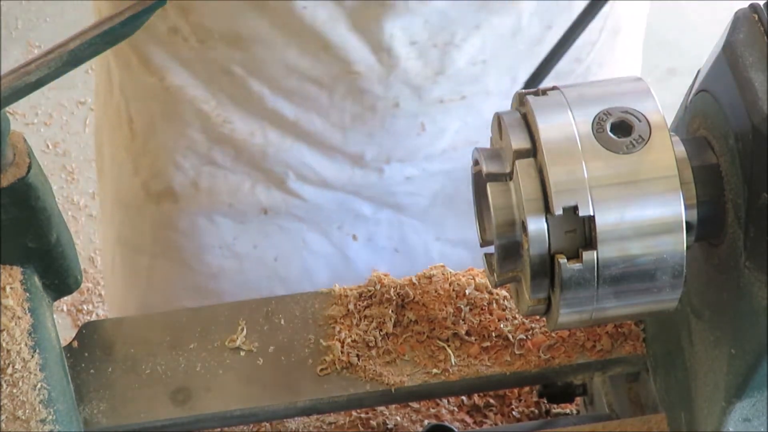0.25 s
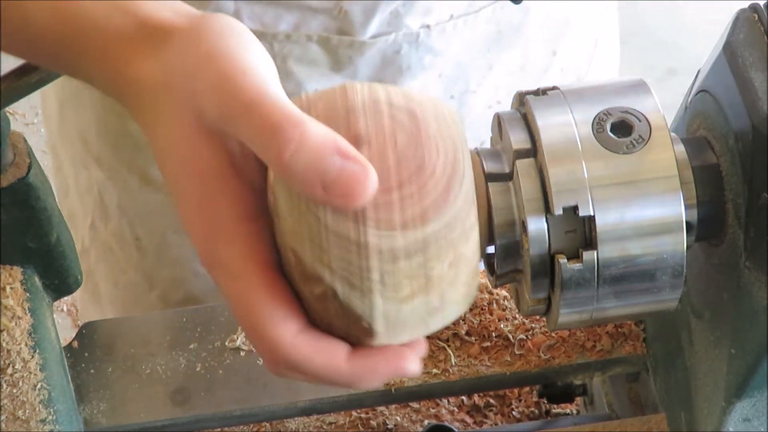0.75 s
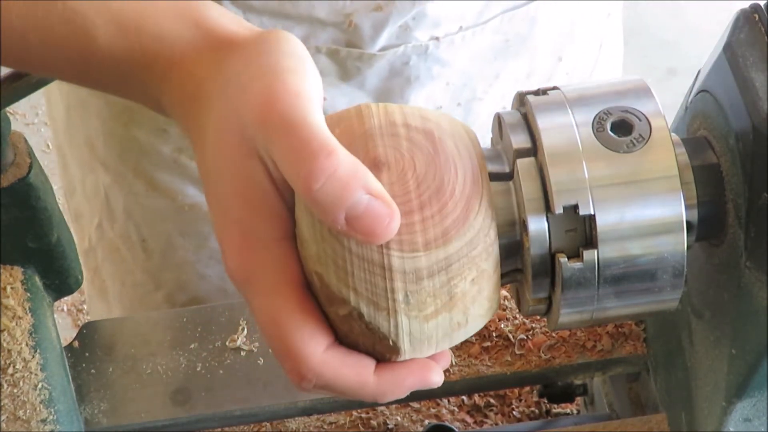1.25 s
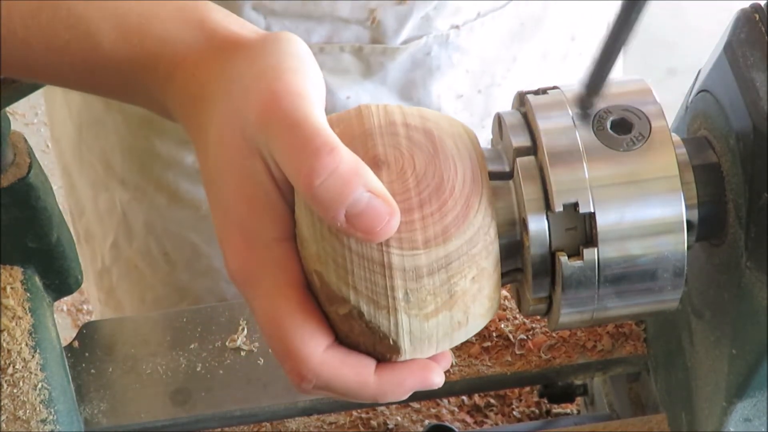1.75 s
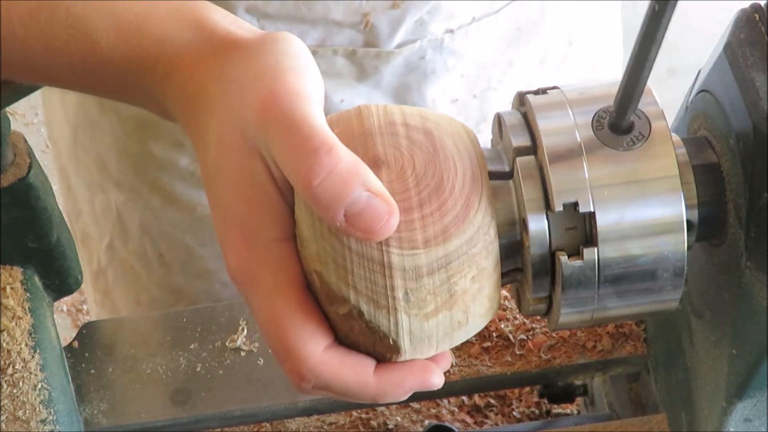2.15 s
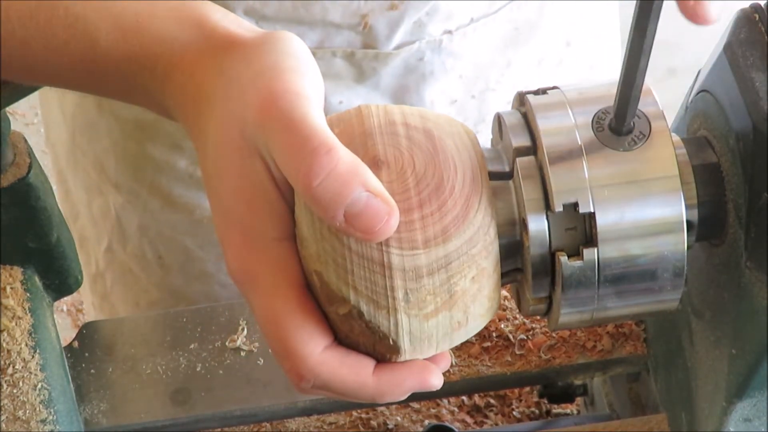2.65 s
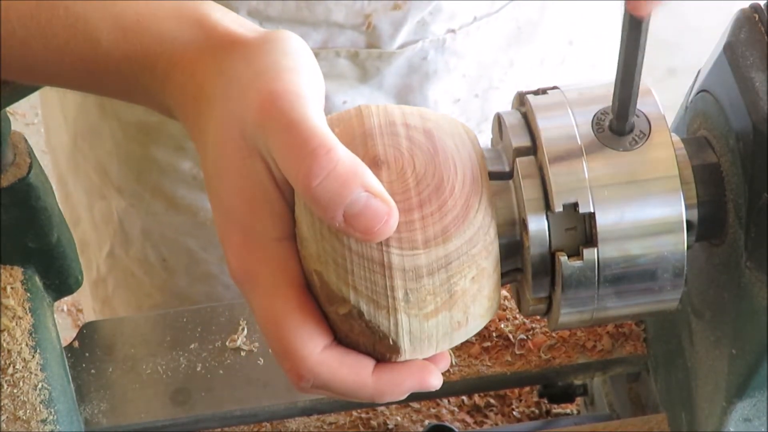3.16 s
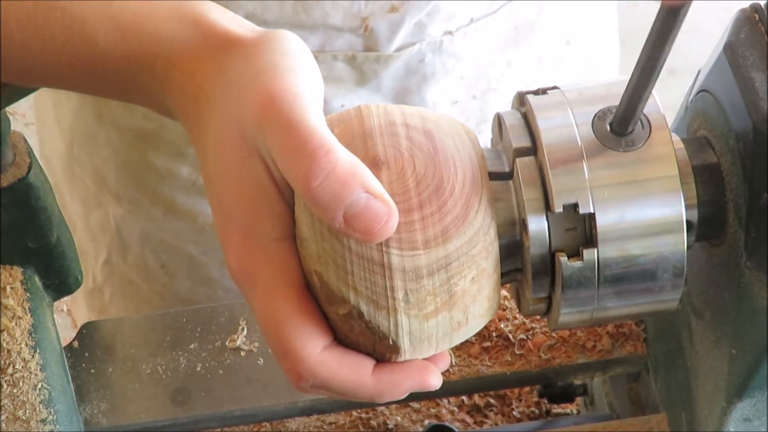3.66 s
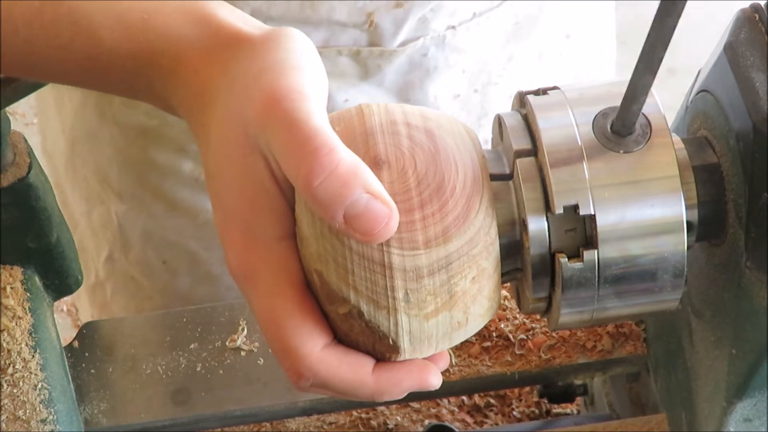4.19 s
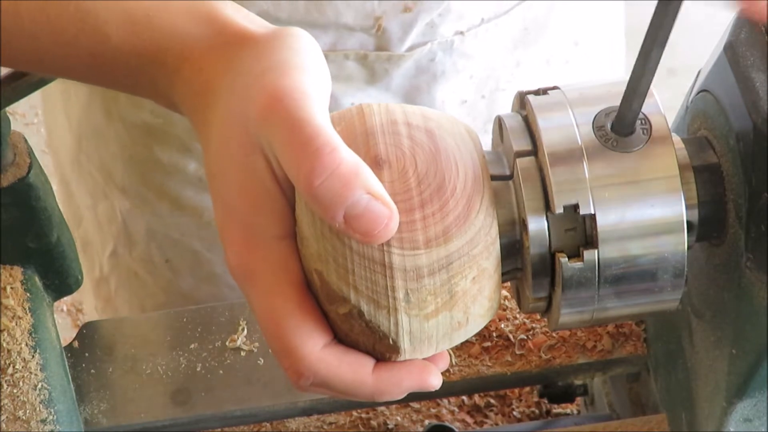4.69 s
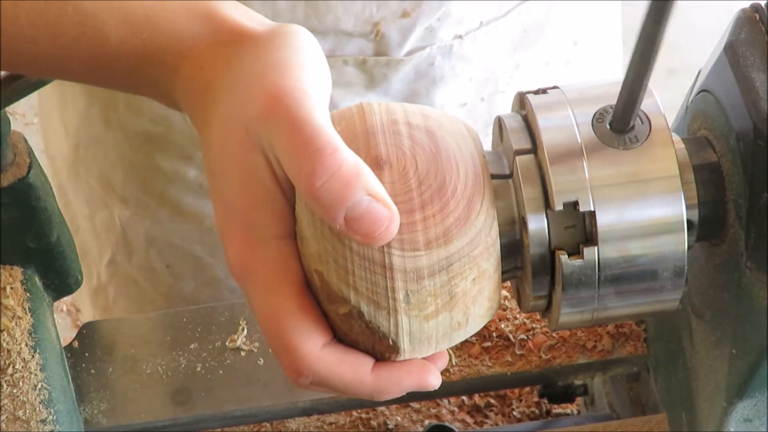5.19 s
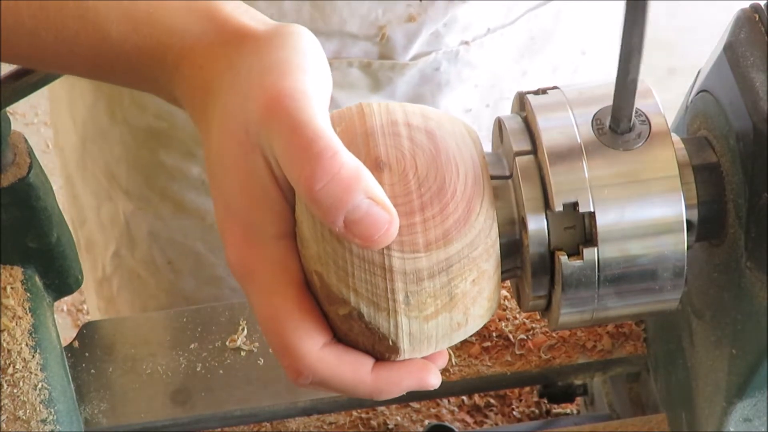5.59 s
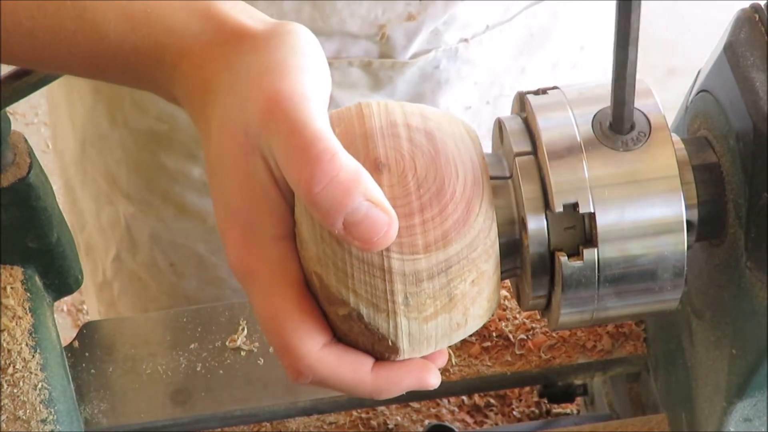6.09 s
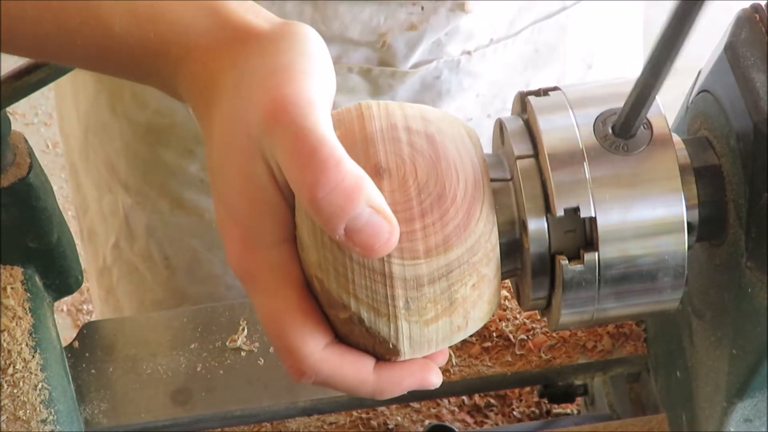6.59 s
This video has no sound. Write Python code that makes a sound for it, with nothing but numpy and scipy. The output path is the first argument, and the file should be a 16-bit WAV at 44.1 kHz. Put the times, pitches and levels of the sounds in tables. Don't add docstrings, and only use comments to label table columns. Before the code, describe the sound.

Close stereo pickup in a small workshop with short reflections and faint traffic outside. From 0 to 0.5 s, hands brush and drag drily over wood, with a tiny metal tick. At 0.7 s a heavy, hollow wooden knock lands on steel jaws, with bright chinks and a low hum from the lathe bed; softer woody bumps follow until 1.1 s. A very sharp steel tap rings at 1.67 s and bounces; another hard clink at 2.0 s leads to light grazes and taps at 2.23 and 2.32 s. A soft engine and thin gear whine pass around 2-3.3 s. A short squeak, then the key clacks loudly into its socket at 3.48 s. A catch at 4.05 s is followed by small clicks, scrapes, cloth rustle and high squeaks near 6.1 s. A second vehicle's rising engine and tyre roar swell from 4.7 s to the end, with crisp clicks at 6.7 and 6.82 s.

```python
import sys
import numpy as np
from scipy import signal
from scipy.fft import rfft, irfft, next_fast_len
from scipy.io import wavfile
from scipy.ndimage import uniform_filter1d

SR = 44100
rng = np.random.default_rng(int(sys.argv[2]) if len(sys.argv) > 2 else 0)


def dump(signal):
    limited = np.clip(np.atleast_2d(signal).T, -1, 1)
    pcm = np.round(limited * 32767).astype(np.int16)
    wavfile.write(sys.argv[1], SR, pcm)


def ratio(d):
    e = np.asarray(d, float) / 20
    return 10 ** e


N = 301644


def evened(x):
    return x / np.sqrt(np.mean(x ** 2) + 1e-20)


def peaked(x, db):
    return ratio(db) * x / np.abs(x).max()


def read(points, hz):
    f, value = np.transpose(points)
    return np.interp(np.log(hz + 1), np.log(f + 1), value)


def curve(rows):
    s, *columns = np.transpose(rows)
    t = np.arange(N) / SR
    inside = uniform_filter1d(1. * (t >= s[0]) * (t <= s[-1]), size=800)
    return [np.interp(t, s, c) for c in columns] + [inside]


def add(mix, s, sound):
    part = mix[..., round(s * SR):][..., :sound.shape[-1]]
    part += sound[..., :part.shape[-1]]


def ring(modes, seconds):
    t = np.arange(round(seconds * SR)) / SR
    return sum(ratio(db - 60 * t / t60) * np.sin(2 * np.pi * hz * t) for hz, db, t60 in modes)


def swelling(x, rise_s):
    return x * (1 - np.exp(-np.arange(len(x)) / SR / rise_s))


def resonate(x, hz, width):
    turn = np.exp(2j * np.pi * np.cumsum(hz * np.ones(len(x))) / SR)
    r = np.exp(-np.pi * width / SR)
    return 2 * (turn * signal.lfilter([1 - r], [1, -r], x / turn)).real


def resonate_twice(x, hz, width):
    return resonate(resonate(x, hz, width), hz, width)


def highpassed(x, order, hz):
    return signal.sosfilt(signal.butter(order, hz, "high", fs=SR, output="sos"), x)


# f/Hz, likeness (0-1)
LIKENESS = [(60, 0.99), (130, 1), (250, 0.75), (700, 0.71), (1500, 0.81), (4000, 0.062), (12000, 0.067)]


def two_sided(a, b, hz, wide=1):
    same = np.clip(read(LIKENESS, hz), 0, 1)[:, None]
    mid, side = np.sqrt(1 + same) * a, wide * np.sqrt(1 - same) * b
    return np.array([mid + side, mid - side])


def hiss(tone, patchy_db, flicker_db):
    size = 2048 if tone[0][0] < 100 else 512
    frames, hz = N // (size // 4) + 6, np.fft.rfftfreq(size, 1 / SR)
    a, b, c, d, patches = rng.standard_normal((frames, len(hz), 5)).T
    flicker = evened(uniform_filter1d(patches[0], size=5))
    patches = uniform_filter1d(patches, size=6, axis=0)
    patches = evened(uniform_filter1d(patches, size=16, axis=1))
    level_db = read(tone, hz)[:, None] + patchy_db * patches + flicker_db * flicker
    z = two_sided(a + 1j * b, c + 1j * d, hz) * ratio(level_db)
    return evened(signal.istft(z, nperseg=size, noverlap=size * 3 // 4)[1][:, :N])


# f/Hz, t60/s
SHOP_T60 = [(200, 0.52), (1000, 0.33), (3000, 0.46), (8000, 0.3), (15000, 0.12)]


def shop(x, colour, wide, bands=()):
    taps = np.zeros((2, SR // 2))
    at = np.arange(120, SR // 2 - 20, 20)
    at = at + rng.integers(0, 20, (2, len(at)))
    np.put_along_axis(taps, at, rng.choice([-1., 1.], at.shape), 1)
    hz, t, z = signal.stft(taps, SR, nperseg=256)
    z = z * ratio(-60 * t / read(SHOP_T60, hz)[:, None])
    tail = signal.istft(two_sided(z[0], z[1], hz, wide), SR, nperseg=256)[1]
    hz = np.arange(SR // 2 + 1)
    lift_db = sum(db / (1 + (2 * (hz - f) / width) ** 2) for f, width, db in bands)
    tail = irfft(rfft(tail, SR) * ratio(read(colour, hz) + lift_db), SR)[:, :SR // 2]
    return signal.oaconvolve(x[None], tail / np.linalg.norm(tail[0]), axes=1)[:, :N]


# t/s, level/dB
ROAR_LEVEL = [(0.0, -52.5), (.8, -50), (1.4, -52.5), (2.2, -53.5), (2.6, -50.5), (3.35, -49), (3.8, -52.5),
              (4.4, -47.5), (5.3, -45.5), (5.9, -43), (6.4, -38), (6.84, -34)]
# f/Hz, density/(dB per Hz)
ROAR_TONE = [(210, -38), (350, -8), (563, -11.5), (931, -4.5), (1210, -6), (1420, -5), (3290, -16.5),
             (4820, -25.5), (7860, -35), (9000, -46.5), (11700, -70.5), (19800, -120)]
RUMBLE_TONE = [(12, -38), (20, -14.5), (108, -4.5), (149, -8.5), (320, -9.5), (406, -17), (440, -13.5),
               (507, -14), (541, -17.5), (900, -22), (1170, -34.5), (1980, -120)]
TREAD_TONE = [(900, -37.5), (2000, 2), (3200, 1), (4200, -11.5), (6000, -29), (9000, -58)]


def tyres():
    roar_db = curve(ROAR_LEVEL)[0]
    rumble_db = -50 + 0.67 * (roar_db + 52)
    tread_db = -39.5 + 2.2 * (roar_db + 26.5)
    out = ratio(roar_db) * hiss(ROAR_TONE, patchy_db=1.5, flicker_db=.4)
    out += ratio(rumble_db) * hiss(RUMBLE_TONE, patchy_db=2.5, flicker_db=0.0)
    return out + ratio(tread_db) * hiss(TREAD_TONE, patchy_db=-3.0, flicker_db=1.0)


# start t/s, firing f/Hz, gain/(Hz per s)
ENGINE_SPEEDS = [
    (1.699, 105.2, 18),
    (4.7, 100, 7.9),
]
# t/s, level/dB
ENGINE_LEVELS = [
    [(1.7, -72.5), (2.0, -47.5), (2.9, -51.5), (3.45, -59.5)],
    [(4.7, -52), (5.42, -43), (5.7, -34.5), (6.39, -32.5), (6.5, -38.5), (6.66, -39.5), (6.84, -29.5)],
]
# multiple of firing rate, level/dB
ENGINE_ORDERS = [(.5, -14.5), (1, -5), (1.5, -32.5), (2, -15.5), (2.5, -15), (3, -23.5)]


def engines():
    out = np.zeros(N)
    for (start_s, start_hz, gain_hz), load in zip(ENGINE_SPEEDS, ENGINE_LEVELS):
        db, inside = curve(load)
        turns = np.cumsum(start_hz + gain_hz * (np.arange(N) / SR - start_s)) / SR
        for k, order_db in ENGINE_ORDERS:
            drift = uniform_filter1d(rng.standard_normal(N // 16 + 1), size=312)
            waver_db = k * evened(drift).repeat(16)[:N]
            wave = np.sqrt(2) * np.sin(2 * np.pi * (k * turns + rng.random()))
            out += ratio(db + order_db + waver_db) * inside * wave
    return out


# t/s, level/dB
BUFFET_LEVEL = [(4.9, -72.5), (5.1, -47.5), (5.35, -50.5), (5.5, -44), (6.2, -63.5), (6.84, -61)]


def buffet():
    db, inside = curve(BUFFET_LEVEL)
    return ratio(db) * inside * evened(resonate_twice(rng.standard_normal(N), 46, 25))


# t/s, f/Hz, level/dB
WHINE_TRACK = [(2.35, 1050, -79), (2.43, 1090, -54), (2.7, 1073, -64), (3.1, 1097, -53.5), (3.3, 1080, -85)]


def whine():
    hz, db, inside = curve(WHINE_TRACK)
    return ratio(db) * inside * evened(resonate(rng.standard_normal(N), hz, 14.0))


# f/Hz, density/(dB per Hz)
RUSTLE_SPECTRUM = [(1470, -51), (2500, -18), (3180, -8.5), (4370, -4), (6970, -9), (13300, -10.5),
                   (15000, -7.5), (16000, -22.5)]
# middle t/s, level/dB, half length/s
ARM_MOVES = [(0.0, -58, 0.22), (0.47, -63, 1), (1.421, -64, 0.3), (2.593, -66, 0.11), (2.85, -70.5, 0.24),
             (3.3, -63.5, 0.4), (3.886, -60.5, 0.23), (4.318, -61, 0.29), (4.748, -58.5, 0.33),
             (4.99, -68, 0.37), (5.525, -54, 0.31), (6.062, -55, 0.295), (6.6, -59, 0.56),
             (6.84, -68, 0.071)]
# t/s, level/dB, length/s, low rasp share (0-1)
KEY_SCRAPES = [(3.425, -67, 0.087, 1), (3.48, -41.5, 0.0071, 0.9), (3.71, -71.5, 0.017, 0.2),
               (3.989, -57.5, 0.012, 0.2), (4.225, -61, 0.0238, 0.2), (4.27, -60, 0.024, 0.23),
               (4.455, -61.5, 0.055, 0), (4.595, -73.5, 0.036, .1), (4.709, -52.5, 0.049, 0.48),
               (4.931, -51.5, 0.018, 0.6), (4.966, -47.5, 0.024, 0.1), (5.003, -53.5, 0.094, 0),
               (5.206, -57, 0.083, 0.14), (5.249, -63, 0.075, 0), (5.595, -72, 0.025, 0.07),
               (5.813, -58.5, 0.08, 0), (6.343, -56, 0.065, 0.2), (6.606, -54, 0.053, 0.48),
               (6.688, -61, 0.065, 0), (6.819, -55, 0.011, 0.8)]


def rustle():
    t, low = np.arange(0, N, 64) / SR, np.zeros(N)
    fine = ratio(-70)
    for s, db, half_s in ARM_MOVES:
        fine = fine + ratio(db) * np.cos(np.pi / 2 * np.clip((t - s) / half_s, -1, 1)) ** 2
    fine = fine.repeat(64)[:N]
    for s, db, length_s, share in KEY_SCRAPES:
        swell = ratio(db) * np.hanning(round(length_s * 2 * SR))
        add(fine, s - length_s, swell)
        add(low, s - length_s, share * swell)
    out = fine * hiss(RUSTLE_SPECTRUM, patchy_db=1.0, flicker_db=2.0)
    return out + 4.8 * low * evened(resonate(rng.standard_normal(N), 1700, 3830))


# t/s, f/Hz, level/dB, length/s
KEY_SQUEAKS = [
    (3.297, 1562, -52.5, 0.097),
    (6.039, 7770, -52, 0.084),
    (6.191, 7850, -55, 0.031),
]


def squeaks():
    out = np.zeros(N)
    for s, hz, db, length_s in KEY_SQUEAKS:
        whistle = evened(resonate(rng.standard_normal(round(length_s * SR)), hz, hz / 87))
        add(out, s - length_s / 3, ratio(db) * whistle * np.hanning(len(whistle)))
    return out


# start t/s, length/s, level/dB, centre f/Hz
HAND_STROKES = [(0.0, 0.049, -49, 880), (0.103, 0.016, -42.5, 700), (0.277, 0.095, -44, 1750),
                (0.435, 0.04, -35, 1520), (0.502, 0.044, -51, 1770)]


def hands():
    start, length, db, centre_hz = np.transpose(HAND_STROKES)[..., None]
    grip_s, let_go_db_per_s = 0.05, 211
    t = np.arange(SR) / SR
    grip = np.clip((t - start) / grip_s + 1, 0, 1) ** 2
    press = grip * ratio(db - let_go_db_per_s * np.maximum(t - start - length, 0))
    hz = (press * centre_hz).sum(0) / press.sum(0)
    slip_db = 1.85 * np.minimum(rng.exponential(1, SR // 40 + 1), 4)
    slips = rng.standard_normal(SR) * ratio(slip_db).repeat(40)[:SR]
    drag = resonate(resonate(slips, hz, 700), hz, 1600)
    drag = drag + 0.55 * resonate(resonate(slips, 1940, 1700), 2630, 3500)
    return np.pad(np.sqrt((press ** 2).sum(0)) * evened(drag), (0, N - SR))


# f/Hz, level/dB, t60/s
BED_MODES = [(205.4, -34.5, 3.55), (196, -43, 1.7)]


def bed():
    out = np.zeros(N)
    add(out, .72, ring(BED_MODES, 1) * signal.windows.tukey(SR, .2))
    return out


# f/Hz, level/dB, t60/s
JAW_MODES = [(5880, 8, 0.034), (6080, 2, .03), (6300, -3, .02), (12900, -6, 0.046), (13150, -4, 0.037)]
# t/s, level/dB
JAW_CHINKS = [(.707, -40), (0.841, -53), (1.036, -45)]


def jaws():
    out = np.zeros(N)
    for s, db in JAW_CHINKS:
        add(out, s, ratio(db) * swelling(ring(JAW_MODES, .2), 0.0023))
    return out


# t/s, peak level/dB, strongest f/Hz, spread/octaves, grit/dB
WOOD_KNOCKS = [(0.694, -21, 510, 1.4, -1), (.696, -7.5, 279, 1.15, -11), (.737, -19, 227, 0.64, -16),
               (.835, -17.5, 412, 0.57, -20.5), (0.996, -24, 400, 0.72, -5.5),
               (1.014, -24.5, 400, 0.33, -10), (1.0222, -21.5, 338, 0.62, 1.5),
               (1.026, -18, 338, 0.13, -20), (1.063, -25, 275, 0.44, -12), (1.123, -24.5, 388, 0.66, -13),
               (3.487, -26, 356, 0.5, -18.5), (4.051, -29.5, 358, 0.38, -13),
               (4.064, -34.5, 340, 0.11, -22), (4.697, -43, 900, 0.6, 10.5), (4.716, -36.5, 346, 0.25, 5),
               (5.234, -35, 303, 0.52, -8)]
# f/Hz, level/dB, t60/s
WOOD_MODES = [(129, -5.5, 0.2), (168, -10, 0.25), (208.4, 2.5, 0.2), (238.4, 12.5, 0.06),
              (292.5, -1.5, 0.2), (338, 5.5, 0.1), (376.6, 3.5, 0.083), (400, 5, 0.09), (477, 1, 0.11),
              (548, -14, 0.45), (730, -1, 0.13), (840, -14, 0.085), (952, 6, 0.21)]
# f/Hz, width/Hz, level/dB
GRIT_BANDS = [(906, 414, -1), (1295, 350, 4), (1672, 520, -2), (2460, 460, -11.5), (5500, 910, -22)]


def blank():
    out, t = np.zeros(N), np.arange(2000) / SR
    palm_s, ring_share = 0.033, 0.29
    stilled = ring_share + np.exp(-(np.arange(SR) / SR / palm_s) ** 2)
    for s, db, centre_hz, spread, grit_db in WOOD_KNOCKS:
        struck = [(hz, mode_db - 6 * (np.log2(hz / centre_hz) / spread) ** 2, t60)
                  for hz, mode_db, t60 in WOOD_MODES]
        add(out, s, peaked(swelling(ring(struck, 1) * stilled, 0.0024 / spread), db))
        crunch = rng.standard_normal(2000) * (1 - np.exp(-t / 0.00068)) * np.exp(-t / 0.0093)
        shift = 1 + 0.088 * rng.standard_normal()
        grit = sum(ratio(g_db) * resonate_twice(crunch, hz * shift, width) for hz, width, g_db in GRIT_BANDS)
        add(out, s, peaked(grit, db + grit_db))
    return highpassed(out + jaws(), 4, 100)


# t/s, peak level/dB, centre f/Hz, width/Hz
GRIT_TICKS = [(2.391, -41, 3000, 3000), (2.394, -34.5, 2760, 1500), (3.5125, -27, 5000, 900),
              (4.691, -31, 5800, 1000), (4.7605, -37, 5750, 1200), (4.9225, -36.5, 6010, 2500),
              (4.9255, -28.5, 3270, 1500), (4.929, -41, 8000, 6000), (4.94, -40.5, 3500, 2500),
              (4.959, -32, 5500, 2500), (5.2165, -42, 1690, 2500), (6.588, -33, 5400, 2000),
              (6.609, -34.5, 5500, 1500), (6.692, -45.5, 11000, 6000), (6.7025, -22.5, 5150, 2500),
              (6.815, -36, 6000, 8000), (6.82, -19, 4200, 3860)]


def ticks():
    out, t = np.zeros(N), np.arange(300) / SR
    for s, db, hz, width in GRIT_TICKS:
        puff = rng.standard_normal(300) * np.exp(-t / 0.0015)
        add(out, s, peaked(resonate_twice(puff, hz, width), db))
    return out


# f/Hz, width/Hz, lift/dB
CROWDED_MODES = [(336, 90, -1), (878, 40, -1), (1090, 35, 6.5), (1380, 90, 9.5), (1560, 40, 12.5),
                 (1800, 70, 10.5), (2130, 80, 1.5), (2430, 60, 1), (2784, 160, 4.5), (2926, 70, 1.5),
                 (3870, 160, 3), (4780, 110, 3.5), (7450, 200, 4.5), (10100, 250, 5.5)]


def key(taps, peaks, rings, after, after_db, damped_s):
    out, clicks, blows, t = np.zeros(N), np.zeros(N), np.zeros(N), np.arange(600) / SR
    chuck = swelling(ring(rings, .4), 0.0015)
    hz, width, mode_db = np.transpose(peaks)[..., None]
    sense = (-1.) ** np.arange(len(peaks))[:, None]
    for s, db, chatter_ms, tilt_db, ring_db in taps:
        contact_s = max(chatter_ms, .1) / 1000
        delay_s = .25 * contact_s * rng.standard_normal((len(peaks), 1)) ** 2
        since = np.maximum(t - delay_s, 0)
        level = sense * width * ratio(mode_db + tilt_db * np.log2(hz / 1000))
        modes = level * np.exp(-np.pi * width * since) * np.sin(2 * np.pi * hz * since)
        grip = np.exp(-(t / damped_s) ** 2)
        add(clicks, s, peaked(modes.sum(0) * grip, db))
        chatter = rng.standard_normal(600) * np.exp(-(t / contact_s) ** 2)
        chatter = resonate(resonate(chatter, 4200, 4800), 4300, 9000)
        add(clicks, s, peaked(chatter, db - 24 + 0.46 * min(tilt_db, 0)))
        add(out, s, peaked(chuck, db + ring_db - 1.5))
        add(blows, s, ratio(db + ring_db + after_db) * np.ones(1))
    out += highpassed(clicks, 3, 560)
    pan_db = np.array([[-0.9], [0.9]])
    return out * ratio(pan_db / 2) + shop(blows, after, 0.45, CROWDED_MODES)


# f/Hz, density/(dB per Hz)
KEY_FACE_TAPS = [
    (1.584, -43, 1.5, -4, -14),
    (1.666, 5, 0.498, 1, -19),
    (1.66735, -5.5, 0.38, -2.5, -18),
    (2.396, -38, 1.6, -17, -13),
    (3.364, -39, 4.3, -4.5, 1),
]
KEY_FACE_MODES = [(989, 76, -1.5), (1340, 160, -12), (2133, 200, -5), (2640, 130, -6.5), (2990, 88, 0),
                  (3450, 60, -11), (3750, 250, -7.5), (4730, 116, -2.5), (5400, 150, -17),
                  (7300, 170, -21.5), (9500, 400, -22.5), (10300, 400, -20.5), (12200, 340, -27),
                  (14700, 100, -39)]
CHUCK_RING = [(890, -3.5, 0.33), (1090, -3.5, 0.27), (1363, -3.5, 0.27), (1430, -10, 0.27),
              (1555, -9.5, 0.353), (1750, -13, 0.63), (1880, -6.5, 0.26), (2160, -11, 0.12),
              (2510, -1.5, 0.18), (2710, -9, 0.42), (3190, 2, 0.13), (3190, -9.5, 0.16), (4000, -12, 0.3),
              (4900, -4.5, 0.16)]
FACE_TAIL = [(120, -45), (200, -15.5), (338, 5.5), (485, -21), (849, -15), (998, 0.5), (1380, -6.5),
             (1910, -15.5), (2250, -3), (3350, -9), (4400, -21), (4735, -4.5), (5170, -28.5), (15000, -49)]


def key_on_face():
    return key(KEY_FACE_TAPS, KEY_FACE_MODES, CHUCK_RING, FACE_TAIL, after_db=21.6, damped_s=0.0086)


KEY_BOUNCE_TAPS = [
    (1.711, -12.5, 3.4, -12, -15),
    (2.2343, -8.5, 0.76, 1, -25.5),
    (2.3188, -17, 0.44, -3, -22),
]
KEY_BOUNCE_MODES = [(2260, 225, 1), (3730, 190, -6), (4730, 500, -1.5), (6910, 630, -10), (10070, 610, -15),
                    (11800, 180, -35.5), (12600, 270, -27), (13860, 680, -23.5), (15600, 200, -48)]
RIM_TAIL = [(120, -51.5), (200, -20), (451, -3.5), (671, -20), (849, 0), (1380, -12.5), (1720, -14.5),
            (7550, -24), (10600, -38), (11200, -65), (15000, -44.5)]


def key_bouncing():
    return key(KEY_BOUNCE_TAPS, KEY_BOUNCE_MODES, CHUCK_RING, RIM_TAIL, after_db=21.2, damped_s=0.0077)


KEY_RIM_TAPS = [(2.0049, 0, 0.61, 2, -21.5), (4.365, -34.5, 1.7, -11, -23.5),
                (4.928, -23, 0.89, -10, -10.5), (5.2165, -26.5, 0.46, -12.5, -10),
                (5.795, -50.5, 2.15, -4.5, 12), (6.692, -15.5, 0.85, -9.5, -14),
                (6.702, -18, 0.77, -8, -23), (6.713, -34, 0.8, -14.5, -12.5), (6.82, -23, 3.1, -6.5, -18)]
KEY_RIM_MODES = [(900, 193, -1.5), (1290, 150, -1.5), (1940, 250, 4.5), (2570, 91, 3.5), (3760, 220, -3),
                 (4600, 100, 6.5), (5640, 180, -7), (6700, 800, -3.5), (7250, 440, 0.5), (8130, 400, -12),
                 (9300, 430, -6.5), (9860, 400, -29.5), (13400, 830, -27), (15000, 500, -31)]
RIM_CHUCK_RING = [(442, -7.5, 0.18), (827, 6.5, 0.1), (1080, -8, 0.32), (1230, -8, 0.227), (1360, -3, 0.27),
                  (1430, 2, 0.33), (1385, -5, .3), (2134, -4, 0.19), (2557, -15.5, 0.22), (3000, -23, 0.23),
                  (4600, -11.5, 0.14), (6060, -14.5, 0.17)]


def key_on_rim():
    return key(KEY_RIM_TAPS, KEY_RIM_MODES, RIM_CHUCK_RING, RIM_TAIL, after_db=23.0, damped_s=0.008)


KEY_GRAZE_TAPS = [
    (2.041, -18.5, 0.86, -5, -20),
    (2.131, -27.5, 0.6, 3, -6),
    (2.16, -24, 0.56, 4.5, -11.5),
]
KEY_GRAZE_MODES = [(880, 91, 0), (1340, 81, 2.5), (2170, 240, -1.5), (3820, 100, -12.5), (4630, 130, -5.5),
                   (6470, 120, -28.5), (7500, 270, -26), (10000, 100, -30)]


def key_grazing():
    return key(KEY_GRAZE_TAPS, KEY_GRAZE_MODES, RIM_CHUCK_RING, RIM_TAIL, after_db=13.7, damped_s=.015)


KEY_SEAT_TAPS = [(0.159, -37, 3, 1, -25), (3.4517, -29, 5, -6.5, -6.5), (3.484, 6.5, 1.59, 1, -22),
                 (3.4865, -1, 1.6, 3.5, -37), (3.712, -43.5, 1.9, 3, -21.5), (3.7653, -37.5, 4, -3.5, -8),
                 (3.9866, -45, 4.1, 6.5, -31), (5.583, -37, 5.7, 23.5, -23), (6.7481, -38, 4.7, 16, -23)]
KEY_SEAT_MODES = [(1470, 150, -13), (2134, 500, -5.5), (2570, 160, 0.5), (2940, 100, -7.5),
                  (3680, 160, -4.5), (4720, 150, -10.5), (5410, 230, -13), (6080, 300, -8.5),
                  (7650, 213, -3.5), (9950, 170, -4.5), (10340, 300, -10), (11000, 98, -22.5),
                  (11600, 200, -6), (14180, 140, -9)]
SEAT_CHUCK_RING = [(337, -6, 0.12), (880, 3, 0.13), (1315, -8, 0.3), (1360, -9.5, .3), (1368, -1, 0.21),
                   (1407, -13, 0.33), (1610, -13.5, 0.48), (2770, -15, .25), (2640, -16.5, .25),
                   (2830, -13.5, .25), (2930, -11.5, 0.37), (3960, -21, 0.34), (4790, -18, .25),
                   (10000, -14, 0.25)]
SEAT_TAIL = [(120, -55.5), (200, -22), (223, -13), (309, -23.5), (591, -20.5), (880, -11), (1020, -10.5),
             (1330, -8), (1950, -21), (2850, -11), (3350, -22.5), (3850, -16.5), (4300, -19.5),
             (4810, -19.5), (15000, -30)]


def key_in_socket():
    return key(KEY_SEAT_TAPS, KEY_SEAT_MODES, SEAT_CHUCK_RING, SEAT_TAIL, after_db=23.5, damped_s=0.01)


KEY_CATCH_TAPS = [
    (4.0463, -15.5, 2, 2.5, -24.5),
]
KEY_CATCH_MODES = [(1440, 450, -2.5), (2630, 240, -0.5), (3960, 380, 1.5), (6870, 240, -3.5),
                   (8440, 330, -6.5), (10400, 280, -24), (11600, 250, -23), (12500, 220, -25.5),
                   (14000, 470, -23)]


def key_catching():
    return key(KEY_CATCH_TAPS, KEY_CATCH_MODES, RIM_CHUCK_RING, RIM_TAIL, after_db=31.2, damped_s=0.0053)


def scene():
    road = tyres() + engines() + buffet() + whine()
    wood = blank() + hands()
    wood_colour = [(100, -3.0), (300, -4), (1000, -1.5), (8000, 2.0)]  # f/Hz, density/(dB per Hz)
    reflections = ratio(-6.5) * shop(wood, wood_colour, 0.24)
    steel = key_on_face() + key_bouncing() + key_on_rim() + key_grazing()
    steel = steel + key_in_socket() + key_catching() + ticks()
    return road + rustle() + squeaks() + bed() + wood + reflections + highpassed(steel, 2, 180)


def roll_off(x):
    return signal.sosfilt(signal.butter(12, 16330, fs=SR, output="sos"), x)


def record(dry):
    size = next_fast_len(N)
    hz = np.fft.rfftfreq(size, 1 / SR)
    lag_samples = .75
    ports = np.exp(-1j * np.pi * hz * lag_samples / SR * np.array([[1], [-1]]))
    ports = ports * hz / (hz - 30j) / (1 + (hz / 16100) ** 20)
    heard = irfft(rfft(dry, size) * ports, size)[:, :N]
    return roll_off(np.clip(heard, -.97, .97))


dry = scene()
out = record(dry)
dump(out)
```